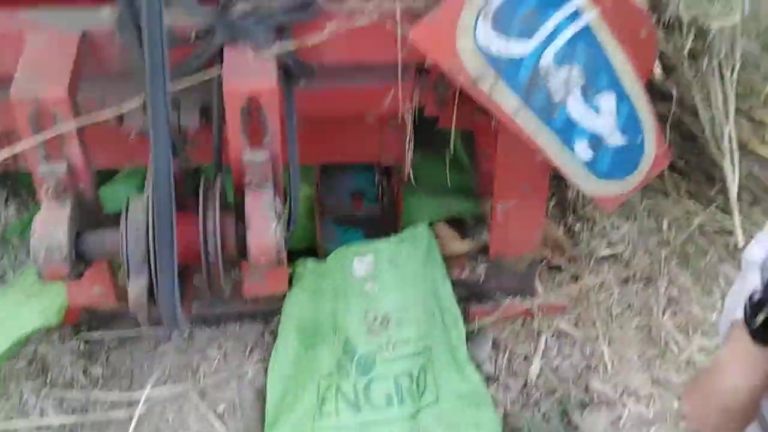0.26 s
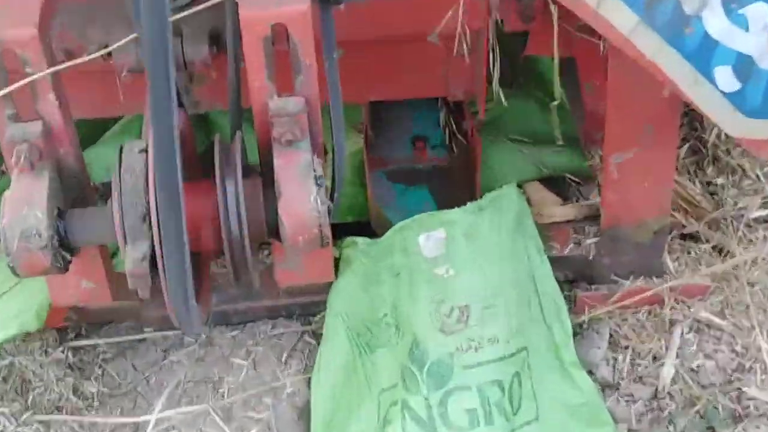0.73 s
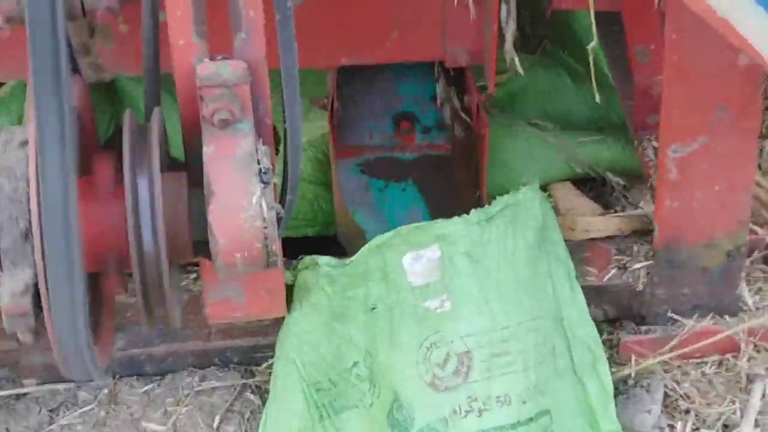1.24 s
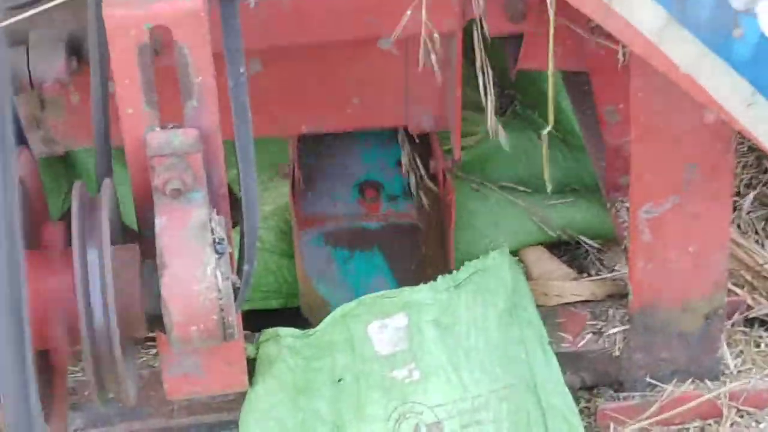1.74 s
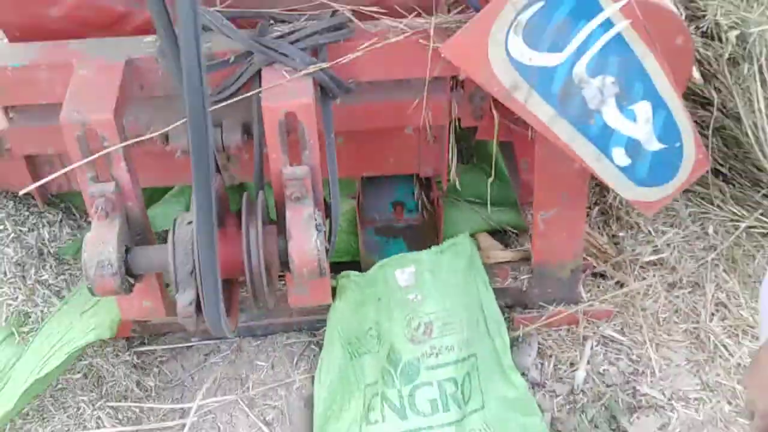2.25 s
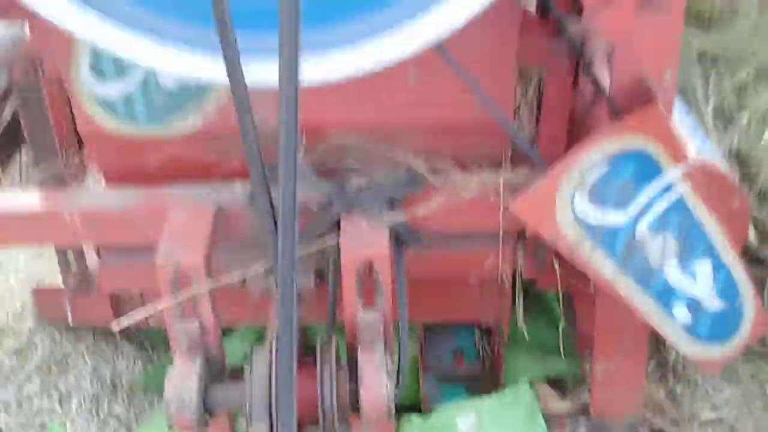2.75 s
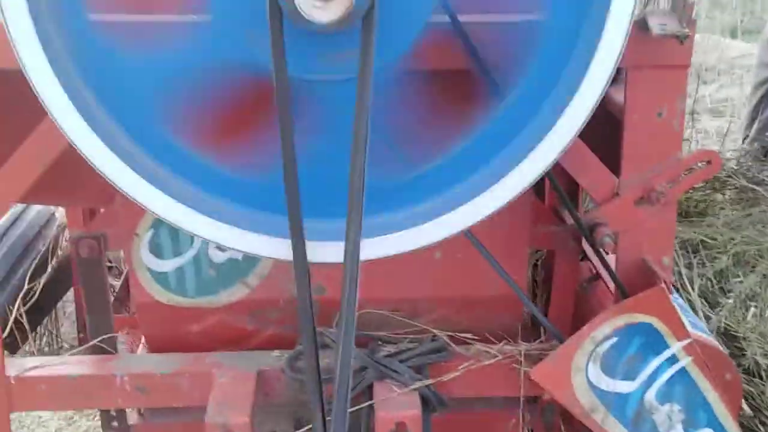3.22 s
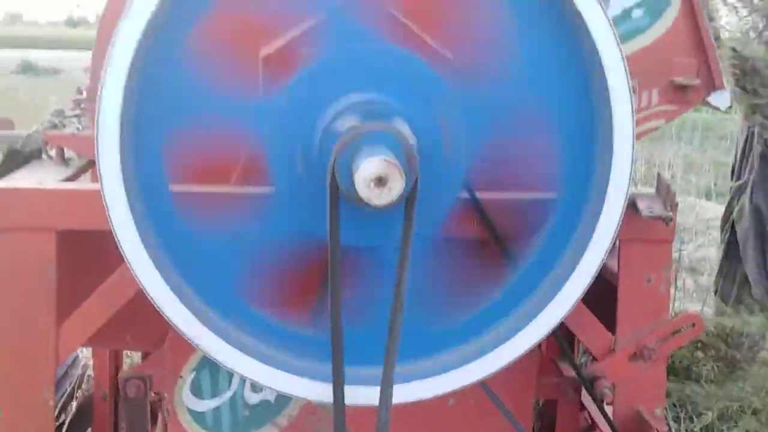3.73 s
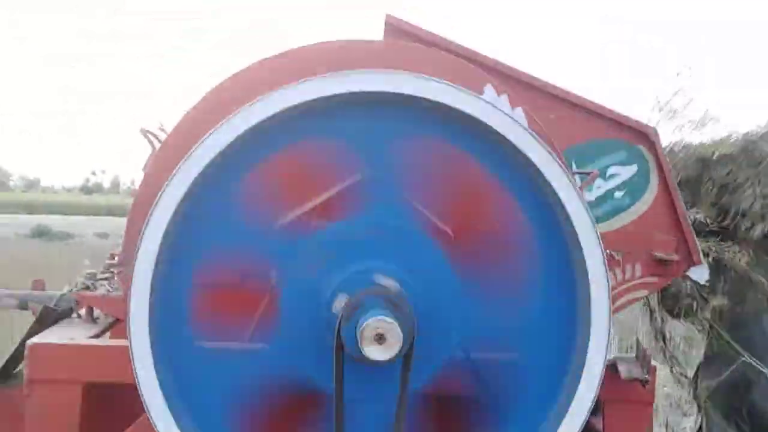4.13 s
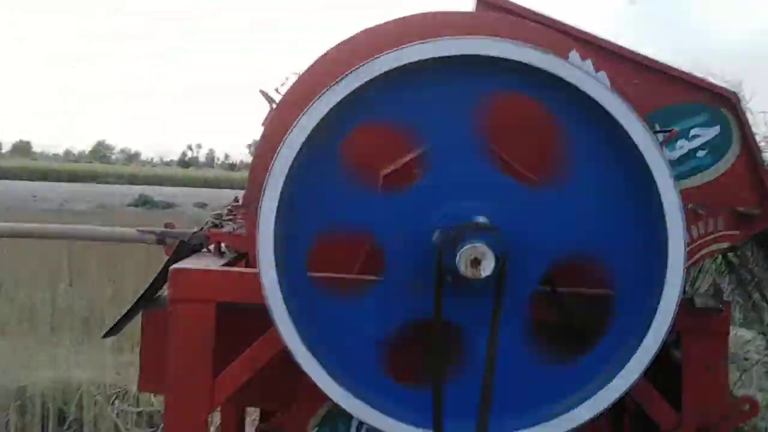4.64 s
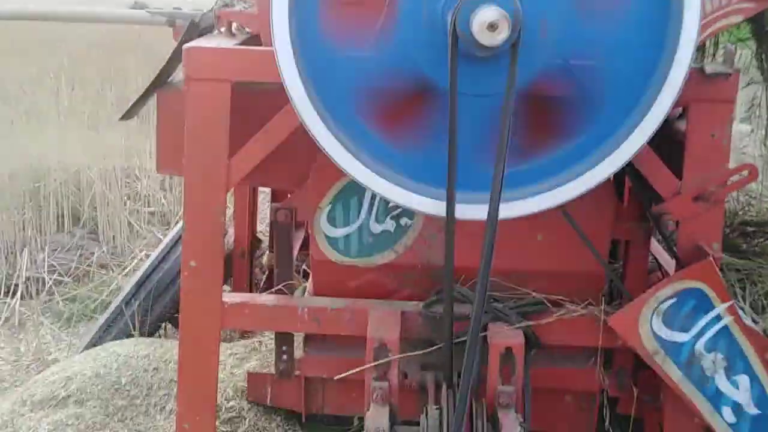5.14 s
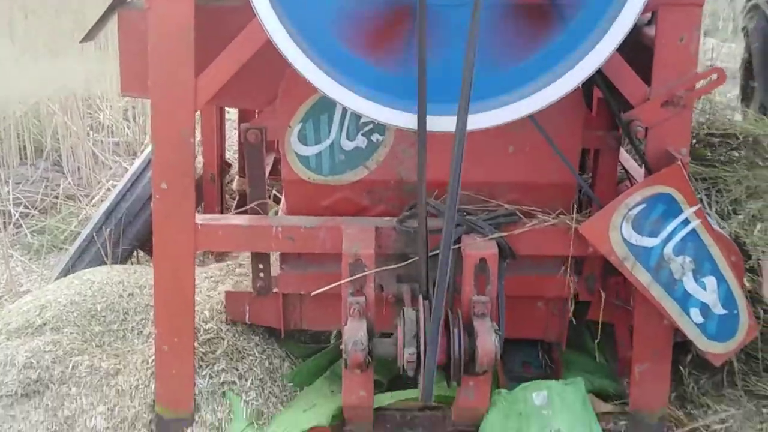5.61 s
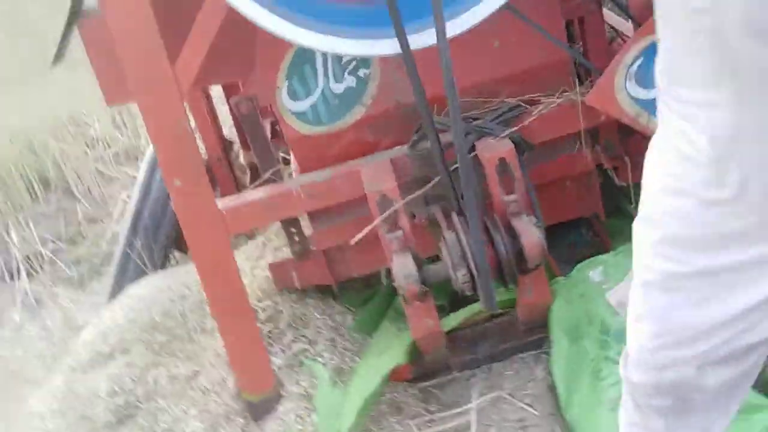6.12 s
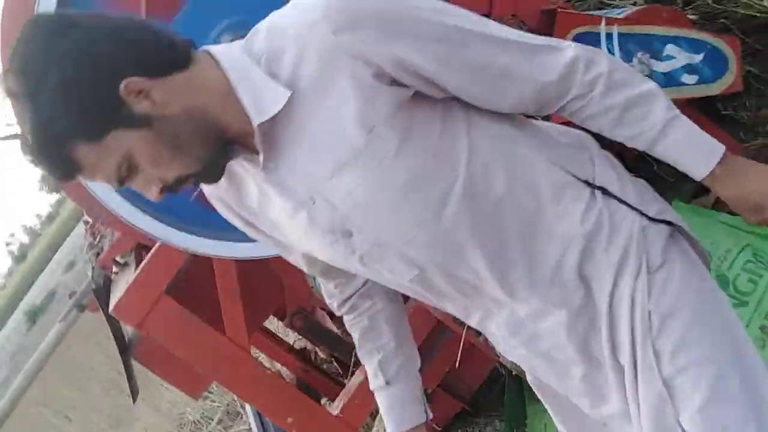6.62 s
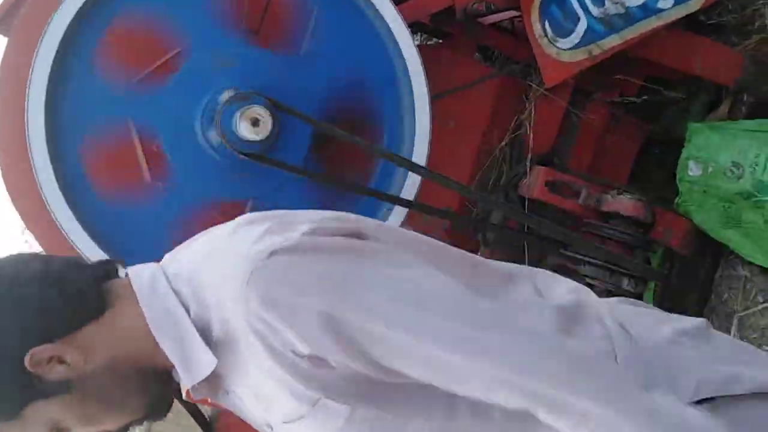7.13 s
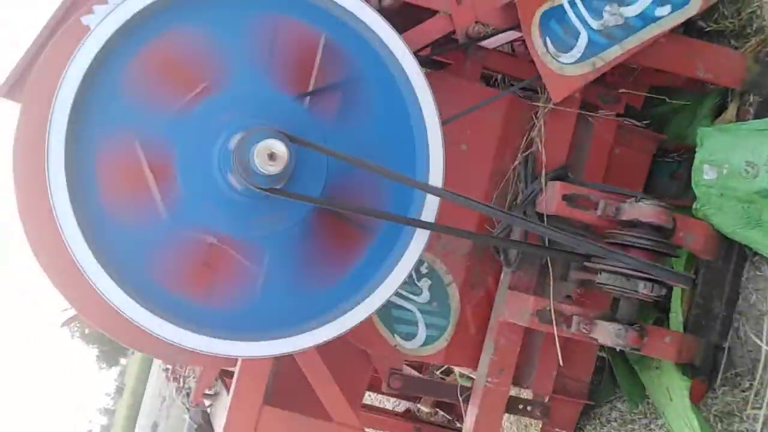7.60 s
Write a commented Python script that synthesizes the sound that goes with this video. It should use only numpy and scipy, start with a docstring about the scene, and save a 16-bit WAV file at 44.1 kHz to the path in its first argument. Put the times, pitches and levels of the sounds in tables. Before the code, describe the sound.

From 0 s a belt-driven thresher is already running at full speed, close and dry in an open field. Its drum rumbles hollowly in a sheet-steel housing, the low and middle tones fluttering and shifting in patches; several times a second one pitch area sinks and snaps back, giving a restless churn. A wide, bright, nearly constant hiss of grain and chaff lies over it, with faint low shaft hums beneath. From about 4.2 s a coarser upper-mid rush fades in on the left. At 4.96 s everything cuts off, silent until about 5.08 s, then abruptly returns. From 5.1 s to the end at 7.9 s the drone is louder, deeper and steadier, the hiss softer. A metal panel sings in brief mid-pitched swells, strongest around 6.8, 7.1 and 7.6 s, with a fainter lower one. Chaff puffs at 5.8 and 7.0 s, with a sharper spit near 7.5 s.

```python
"""A belt-driven thresher runs in an open field, heard through two small microphone ports held close to it. From
the start the drum rumbles in the sheet-steel housing (coloured noise), grain and chaff hiss (high noise) and
shafts hum (wavering sines); throughout, the sound comes and goes in shifting patches. At 4.2 s the ports turn:
two noise bands fade in. Near 5 s the sound drops out and returns from another spot, deeper and with less hiss.
There two panels sing (swelling tones) and chaff spits on the casing (noise puffs)."""
import sys
import numpy as np
from scipy import signal
from scipy.fft import rfft, irfft, next_fast_len
from scipy.io import wavfile
from scipy.ndimage import uniform_filter1d, minimum_filter1d

SR = 44100
rng = np.random.default_rng(int(sys.argv[2]) if len(sys.argv) > 2 else 0)


def wrap_up_sound(samples):
    """Save the sound to the file named by the first command line argument, as 16-bit audio."""
    columns = np.atleast_2d(samples).T
    # keep every value between -1 and 1, then stretch to whole-number steps
    tamed = np.clip(columns, -1, 1)
    steps = np.round(tamed * 32767).astype(np.int16)
    wavfile.write(sys.argv[1], SR, steps)


N = 346626
SWITCH_S, OVERLAP_S = 5.121, 0.05    # change of spot, just after the gap; margin rendered on each side
WINDOW, HOP = 2048, 256    # samples
HZ = np.maximum(np.arange(WINDOW // 2 + 1), 1) * SR / WINDOW    # analysis bins
CUTOFF_HZ = 14680


def from_db(db):
    """Decibels to amplitude gain."""
    return 10 ** (np.asarray(db, float) / 20)


def at_hz(rows, hz):
    """Each column of a spectrum table, interpolated on a log-frequency axis."""
    f, *columns = np.transpose(rows)
    return np.array([np.interp(np.log(hz), np.log(f), column) for column in columns])


def over_time(rows, s):
    """A two-column table of time and value, interpolated at times s."""
    return np.interp(s, *np.transpose(rows))


def slow(shape, size):
    """Noise box-smoothed twice along each axis over about size cells; spread 1."""
    x = rng.standard_normal(shape)
    for axis, cells in enumerate(size):
        for _ in range(2):
            x = uniform_filter1d(x, max(1, round(cells)), axis=axis, mode="wrap")
    return x / x.std()


def wander(size_s, step=32):
    """Slow random curve over the whole sound, changing over about size_s; spread 1."""
    coarse = slow((N // step + 1,), (size_s * SR / step,))
    return np.interp(np.arange(N) / step, np.arange(N // step + 1), coarse)


# Drum rumble. Each row: Hz, relative left dB per Hz, relative right dB per Hz.
FIRST_RUMBLE = [(35, -42, -45), (70.4, -33.5, -27), (139, -32, -40), (195, -19.5, -18), (305, -17.5, -23.5),
                (454, -30.5, -26.5), (605, -21.5, -23), (822, -27, -14.5), (894, -33, -30),
                (1005, -45, -41), (1136, -30.5, -35), (1400, -39, -28.5), (1970, -36.5, -30.5),
                (2540, -67, -31.5)]
SECOND_RUMBLE = [(35, -49, -47), (70, -27, -22.5), (118, -22, -31), (170, -8.5, -5.5), (243, -14.5, -13),
                 (335, -16, -19.5), (476, -12, -11), (603, -59, -39), (745, -20.5, -26), (855, -12, -44),
                 (985, -27, -22), (1510, -24, -19.5), (2110, -20.5, -21), (2340, -41, -24)]
# Ringing housing panels. Each row: Hz, width scale in Hz, relative left dB per Hz, relative right dB per Hz.
FIRST_PANELS = [(230, 12, -12, -13.5), (249.5, 63, -9.5, -8), (280, 12, -17, -13.5),
                (337.4, 14, -13.5, -10), (391, 10, -11.5, -17), (637, 10.4, -14, -12), (478, 16, -28, -11),
                (516, 21, -12, -31), (687, 9, -38.5, -8.5), (679, 12, 0.5, -6.5), (743, 36, -25, -11.5),
                (1220, 140, -29, -31), (1520, 190, -33, -24)]
SECOND_PANELS = [(185.3, 9.6, 4.5, 2), (218, 26, -2, -2), (242, 20, -3, -5.5), (274.8, 16, -4, -3.5),
                 (336.2, 14.7, 1, -1.5), (354, 22, -7, -4.5), (391, 12, -4, -3.5), (437.3, 10.7, 0, -16.5),
                 (474, 10, -9, -7), (802, 95, -13.5, -6.5), (905, 14, -14.5, -22), (1098, 58, -12.5, -26),
                 (1192, 44, -16.5, -14.5), (1420, 20, -14, -18), (1723, 84, -30, -14.5),
                 (2112, 97, -15, -29), (3820, 130, -31, -28), (4455, 90, -20, -26), (6720, 270, -30, -27.5)]
# Rush of grain and chaff. Each row: Hz, relative left dB per Hz, relative right dB per Hz.
FIRST_HISS = [(2460, -39, -29), (3170, -55.5, -24.5), (3700, -55, -26), (4120, -40, -25.5),
              (4550, -26.5, -25.5), (5320, -21.5, -25), (6500, -21.5, -27), (7760, -26, -26.5),
              (9500, -31, -29), (11250, -34.5, -31.5), (14100, -35, -35.5)]
SECOND_HISS = [(2623, -39, -31.5), (2890, -42, -42), (3380, -67, -31.5), (3530, -36, -31.5),
               (4830, -27, -29.5), (5380, -49, -30.5), (5830, -57, -28.5), (6350, -31.5, -31.5),
               (8100, -30.5, -29.5), (9100, -34, -31), (11400, -37.5, -35), (14500, -39, -37.5)]


def housing_power(rumble, panels, hiss):
    """Left and right power spectra: rumble below the first hiss row, hiss above, panel resonances added."""
    power = from_db(np.where(HZ < hiss[0][0], at_hz(rumble, HZ), at_hz(hiss, HZ))) ** 2
    for centre_hz, width_hz, *level_db in panels:
        resonance = 1 / (1 + (2 * (HZ - centre_hz) / width_hz) ** 2) ** 2
        power += from_db(level_db)[:, None] ** 2 * resonance
    return power


# Lulls around one pitch of the rumble. Each row: return in s, length in s, centre in Hz, depth in dB.
LULLS = [(0.323, 0.1, 230, 15), (0.412, 0.063, 750, 17), (0.55, 0.13, 750, 9), (1.042, 0.15, 715, 17),
         (1.166, 0.18, 230, 23), (1.2, 0.13, 770, 19), (1.641, 0.12, 438, 17), (1.592, 0.12, 230, 12),
         (1.822, 0.075, 430, 18), (1.953, 0.17, 774, 16), (2.038, 0.13, 430, 18), (2.477, 0.06, 230, 11),
         (2.506, .2, 430, 16), (2.507, 0.13, 750, 7), (2.941, 0.16, 423, 10.5), (2.947, 0.13, 230, 14),
         (3.367, 0.17, 437, 30), (3.411, 0.29, 740, 12.5), (3.94, 0.28, 230, 14), (3.966, 0.21, 744, 11),
         (4.223, 0.13, 750, 20), (4.464, 0.33, 430, 12), (4.39, 0.089, 750, 12), (4.488, 0.074, 750, 14),
         (6.446, 0.19, 430, 9), (7.057, 0.18, 750, 9), (7.248, 0.12, 429.7, 12)]
LULL_SINK, LULL_RETURN_S = 0.98, 0.025    # share of a lull spent sinking; return time
LULL_SPREAD = 0.33    # reach in pitch, natural-log ratio
REBOUND_SHARE, REBOUND_S = 0.13, 0.032    # overshoot as share of depth; decay


def lulls(s, edges_hz):
    """Loss in dB per pitch region: the level sinks, snaps back, overshoots and settles."""
    loss_db = np.zeros((len(edges_hz) + 1, len(s)))
    centres_hz = np.sqrt(np.multiply(edges_hz[1:], edges_hz[:-1]))
    for back_s, length_s, hz, depth_db in LULLS:
        sinking = np.clip((s - back_s + length_s) / (LULL_SINK * length_s), 0, 1)
        back = np.clip((s - back_s) / LULL_RETURN_S + 0.5, 0, 1)
        rebound = REBOUND_SHARE * np.exp(-np.maximum(s - back_s, 0) / REBOUND_S)
        reach = np.exp(-(np.log(centres_hz / hz) / LULL_SPREAD) ** 4)
        loss_db[1:-1] += depth_db * reach[:, None] * (sinking * (1 - back) - rebound * back)
    return loss_db


# Rumble levels by pitch region. Each row: time in s, then dB of boom, low, low middle, middle, upper,
# low rattle, high rattle.
FIRST_LEVELS = [(0.0, -23.5, -18.5, -43, -31, -29.5, -35.0, -30.5),
                (0.22, -24.5, -31, -26, -17, -25.0, -34.5, -30.5),
                (0.44, -20.5, -26, -27, -22, -26, -33.5, -32.5),
                (0.66, -24.5, -28, -26.5, -21.5, -37, -39.5, -32.5),
                (0.88, -21.5, -28, -26.5, -20.5, -28.5, -29.5, -32.5),
                (1.1, -25.5, -31.5, -23.5, -22.5, -28, -34.5, -31.5),
                (1.32, -23, -29, -30.5, -33, -30.5, -31, -29.5),
                (1.54, -23, -28.5, -26.5, -19, -30, -35, -33),
                (1.76, -25, -27, -31, -28.5, -31.5, -36.5, -29.5),
                (1.98, -22.5, -31, -24.5, -39, -32, -30.5, -31),
                (2.2, -29, -28, -36, -23.5, -28, -35, -30.5),
                (2.42, -22.5, -33, -27, -30, -31.5, -40.5, -32.5),
                (2.64, -25, -25, -33, -21, -29.5, -29.5, -29.5),
                (2.86, -21.5, -34, -24.5, -25.5, -29.5, -35, -33),
                (3.08, -23, -28.5, -28, -26, -34.5, -35.5, -33),
                (3.3, -25.5, -35, -25.5, -22, -23.5, -41, -32),
                (3.52, -24.5, -32.5, -24.5, -33, -29, -35.5, -34),
                (3.74, -24.5, -49.5, -25.5, -19.5, -27, -37, -29.5),
                (3.96, -25.5, -21.5, -33.5, -27, -31.0, -38, -32),
                (4.18, -20, -27, -34, -14, -28.5, -34.5, -32), (4.4, -23, -30, -25, -36, -32, -33, -25),
                (4.62, -23, -23.5, -33.5, -40, -27.5, -33.5, -35.5),
                (4.84, -22.5, -36, -24, -42, -27.5, -40, -34.5), (4.96, -28, -38, -29, -33, -21, -29, -24)]
SECOND_LEVELS = [(5.14, -15.5, -20, -28, -25, -22, -30.5, -32.5),
                 (5.41, -14, -19.5, -18.5, -39, -21, -32, -29.5),
                 (5.68, -15.0, -19.5, -23, -36, -20.5, -31, -27.5),
                 (5.96, -15.5, -21, -20, -40, -25.5, -33, -29), (6.23, -16, -17, -14, -42, -21, -31, -29.5),
                 (6.5, -16, -25, -30, -31, -24, -26, -28.5),
                 (6.77, -17, -25, -22.5, -29, -20.5, -29.5, -27.5),
                 (7.04, -18.5, -23.5, -16.5, -34, -25.5, -28, -29),
                 (7.32, -13, -16.5, -28, -24, -23.5, -28.5, -26.5),
                 (7.59, -15.5, -17, -21.5, -34, -23, -29.5, -26.5),
                 (7.86, -13, -12.5, -30, -23, -28, -31.5, -30)]
# Flow of grain and chaff. Each row: time in s, hiss level in dB.
FIRST_FLOW = [(0, -19), (4.9, -18.8), (4.96, -16.5), (5.1, -15.5)]
SECOND_FLOW = [(5.14, -26), (5.5, -24), (6.0, -25.3), (7.5, -25.3), (7.86, -26.3)]
WOBBLE_DB, WOBBLE_S = 1.5, 0.022    # random level wobble of each rumble region
GUST_S = 0.045    # time scale of the hiss flutter


def region_levels(s, levels, flow, edges_hz, bass_db, gust_db):
    """Level in dB per region: even bass drone, randomly wobbling rumble regions, gusting hiss, less the lulls."""
    t, *columns = np.transpose(levels)
    level_db = [bass_db + 0 * s]
    for column_db in columns:
        wobble_db = WOBBLE_DB * slow((len(s),), (WOBBLE_S * SR / HOP,))
        level_db.append(np.interp(s, t, column_db) + wobble_db)
    level_db.append(over_time(flow, s) + gust_db * slow((len(s),), (GUST_S * SR / HOP,)))
    return np.array(level_db) - lulls(s, edges_hz)


def patches(frames, patch_hz, patch_s):
    """Random field over pitch and time whose neighbouring cells swell and sink together; spread 1."""
    return slow((len(HZ), frames), (patch_hz / HZ[0], patch_s * SR / HOP))


def patch_gain(shared, together, depth_db):
    """Patchy gain for one side, partly shared, with steep edges and deep hollows, evened in power per pitch."""
    field = np.sqrt(together) * shared + np.sqrt(1 - together) * patches(len(shared[0]), 62.0, 0.06)
    field = 1.56 * np.tanh(1.33 * field) - 0.4 * np.minimum(field, 0) ** 2
    patch = from_db(depth_db[:, None] * field)
    mean_power = uniform_filter1d(np.mean(patch ** 2, 1), size=15)
    return patch / np.sqrt(mean_power)[:, None]


# Left-right likeness. Each row: Hz, likeness from 0 to 1.
FIRST_LIKENESS = [(60, 1), (200, 1), (370, 0.98), (700, 0.91), (1000, 0.85), (1500, 0.2), (2500, 0.023),
                  (14000, 0.009)]
SECOND_LIKENESS = [(60, 0.99), (200, 1), (370, 0.97), (750, 0.88), (1000, 0.77), (1500, 0.1), (2500, 0.065),
                   (14000, 0.094)]
# Patch depth. Each row: Hz, dB per unit of field at first spot left, first right, second left, second right.
PATCHY = [(60, 3, 3.5, 7.5, 7), (207, 2, 0, .5, .5), (680, 4.5, 4, 3, 3.5), (1440, 7.5, 5, 6.5, 4),
          (2160, 8, 7, 3, 0), (2860, 5, 3, 15, 19.5), (3440, 9, 1, 9, 10), (4050, 6, 1.5, 4, 7),
          (4520, 2.5, 2.5, 1, 5), (5700, 2, -0.5, 16, 2), (6500, 2, 1, 6, 2), (8100, 4.5, 1.5, 3, 3.5),
          (14000, 4, 7, 7, 2)]
BASS_TOP_HZ = 149.1    # the frame drones evenly below this


def machine(levels, flow, rumble, panels, hiss, likeness, split_hz, patchy_db, lag_s, bass_db, gust_db, span):
    """Drum and chaff: stereo noise coloured by housing and hiss, levelled per region, broken into patches."""
    length = span[1] - span[0]
    noise = rng.standard_normal((2, length))
    _, s, (mid, side) = signal.stft(noise, SR, nperseg=WINDOW, noverlap=WINDOW - HOP)
    s = s + span[0] / SR
    power = housing_power(rumble, panels, hiss)
    alike = np.clip(at_hz(likeness, HZ)[0], 0, 1)
    centre_power = (power.sum(0) + 2 * alike * np.sqrt(power.prod(0))) / 4
    edges_hz = [BASS_TOP_HZ, *split_hz, hiss[0][0]]
    region = np.searchsorted(edges_hz, HZ)
    totals = np.bincount(region, centre_power * (HZ < CUTOFF_HZ))
    level_gain = from_db(region_levels(s, levels, flow, edges_hz, bass_db, gust_db)[region])

    shared, a = patches(len(s), 60.0, 0.045), alike[:, None]
    together = np.clip(1.1 * a, 0, 1)    # alike sides share their patches
    out = []
    for side_power, depth_db, sign in zip(power, patchy_db, (1, -1)):
        colour = np.sqrt(side_power / totals[region] * len(HZ) / 2)[:, None]
        gain = colour * level_gain * patch_gain(shared, together, depth_db)
        out.append(gain * (np.sqrt(1 + a) * mid + sign * np.sqrt(1 - a) * side))
    out[0] = out[0] * np.exp(-2j * np.pi * HZ * lag_s)[:, None]    # left port lies further from the drum
    sound = signal.istft(np.array(out), SR, nperseg=WINDOW, noverlap=WINDOW - HOP)[1][:, :length]
    return np.pad(sound, ((0, 0), (span[0], N - span[1])))


FLUTTER_EDGES_HZ, FLUTTER_S, BEAT_HZ = (150, 350, 600, 950), 0.014, 64.6


def fluttering(sound, beat_share, flutter_db):
    """Each rumble band flutters randomly on its own and throbs with the drum's beaters."""
    size = next_fast_len(N)
    spectrum, hz = rfft(sound, size), np.arange(size // 2 + 1) * SR / size
    beat = 1 + beat_share * np.cos(2 * np.pi * BEAT_HZ * np.arange(N) / SR)
    out = sound.copy()
    for low, high in zip(FLUTTER_EDGES_HZ, FLUTTER_EDGES_HZ[1:]):
        gain = beat * from_db(flutter_db * wander(FLUTTER_S))
        gain /= np.sqrt(np.mean(gain ** 2))
        band = irfft(spectrum * ((hz >= low) & (hz < high)), size)[:, :N]
        out += (gain - 1) * band
    return out


# Shaft and belt hums. Each row: Hz, RMS dB at the first spot, RMS dB at the second.
HUMS = [(46.5, -47.5, -40), (64.6, -45.5, -45), (92.8, -45, -32.5), (111.3, -48, -45), (184.9, -46, -28.5)]


def hums(column, waver_db):
    """Shaft and belt hums: sines of fixed pitch whose strength wavers a little."""
    t = np.arange(N) / SR
    out = np.zeros(N)
    for row in HUMS:
        strength = np.sqrt(2) * from_db(row[column] + waver_db * wander(0.064))
        out += strength * np.sin(2 * np.pi * (row[0] * t + rng.random()))
    return out


# Noise bands that come forward as the ports turn. Each row: start in s, centre in Hz, width in Hz,
# left dB, right dB.
TURN = [(4.22, 2390, 1340, -30.5, -54), (4.3, 3920, 700, -34.5, -58)]


def turning(rise_s=0.14, flutter_db=4.5, strip_hz=250):
    """Noise bands that fade in as the ports turn, each strip of a band fluttering on its own."""
    start, stop = int(TURN[0][0] * SR), int((SWITCH_S + OVERLAP_S) * SR)
    t, out = np.arange(start, stop) / SR, np.zeros((2, N))
    for s, hz, width_hz, *level_db in TURN:
        edges = np.linspace(hz - width_hz / 2, hz + width_hz / 2, int(width_hz / strip_hz) + 2)
        for low, high in zip(edges, edges[1:]):
            band = signal.butter(2, [low, high], "band", fs=SR, output="sos")
            strip = signal.sosfilt(band, rng.standard_normal(len(t)))
            strip /= strip.std() * np.sqrt(len(edges) - 1)
            flutter = from_db(flutter_db * slow(t.shape, (0.037 * SR,)))
            strength = np.clip((t - s) / rise_s, 0, 1) * flutter
            out[:, start:stop] += from_db(level_db)[:, None] * strength * strip
    return out


# Swells of the two singing panels. Each row: peak time in s, half-length scale in s, swell height in dB.
SINGING = [(5.134, 0.018, -23), (5.823, 0.022, -21.5), (6.162, 0.036, -24), (6.276, 0.062, -21.5),
           (6.444, 0.026, -19.5), (6.617, .05, -22), (6.781, 0.025, -15), (6.958, 0.036, -22),
           (7.135, 0.034, -15), (7.28, 0.043, -18.5), (7.56, .008, -15), (7.588, 0.024, -14.5),
           (7.835, 0.026, -20)]
LOWER_SINGING = [(5.23, .03, -28), (6.53, 0.05, -27), (6.87, .06, -25), (7.14, 0.072, -26.5),
                 (7.3, 0.051, -23), (7.41, 0.031, -24), (7.71, 0.034, -21), (7.8, .06, -33)]
SINGING_HZ, LOWER_SINGING_HZ = 805, 659
SINGING_DB, LOWER_SINGING_DB = -27, -51    # between swells


def singing_panel(hz, swells, between_db, waver_db=2.5, wobble_hz=3.8, wander_hz=2.5):
    """A panel's near-pure tone: it swells faster than it falls, flutters, and wanders slightly in pitch."""
    t = np.arange(N) / SR
    pitch_hz = hz + wobble_hz * wander(0.023) + wander_hz * wander(0.1196)
    coarse = t[::32]
    swelling = np.zeros(len(coarse))
    for s, half_s, height_db in swells:
        scale_s = np.where(coarse < s, 0.82 * half_s, 1.13 * half_s)
        swelling += from_db(height_db) * np.exp(-((coarse - s) / scale_s) ** 2)
    strength = np.interp(t, coarse, swelling) + from_db(between_db)
    strength *= from_db(waver_db * wander(0.014))
    return np.sqrt(2) * strength * np.sin(2 * np.pi * np.cumsum(pitch_hz) / SR)


# Chaff bursts on the casing. Each row: peak time in s, noise dB before the band filter, left-right dB,
# rise scale in s, fade scale in s.
SPITS = [(5.78, -18, 3, .018, 0.022), (7.015, -18, -5, .004, .008), (7.471, -6, 1, .0015, .006)]


def spits(band_hz=(4000, 10500)):
    """Chaff bursts: band-passed noise puffs with Gaussian rise and exponential fade."""
    out, t = np.zeros((2, N)), np.arange(-SR // 20, SR // 10) / SR
    colour = signal.butter(2, band_hz, "band", fs=SR, output="sos")
    for s, level_db, pan_db, rise_s, fade_s in SPITS:
        shape = np.where(t < 0, np.exp(-(t / rise_s) ** 2), np.exp(-np.abs(t) / fade_s))
        puff = shape * signal.sosfilt(colour, rng.standard_normal((2, len(t))))
        start = int((s + t[0]) * SR)
        out[:, start:start + len(t)] += from_db(level_db + np.array([[pan_db], [-pan_db]]) / 2) * puff
    return out


# Lean of the ports. Each row: time in s, left-right dB.
LEAN = [(0, 2.7), (1.2, .3), (2.2, 1.5), (3.7, 1.2), (4.7, -0.6), (5.2, -.6), (5.8, 0.5), (7.86, 0.7)]


def scene():
    """First spot, then second, under a slowly changing left-right lean."""
    t = np.arange(N) / SR
    first_patchy, second_patchy = np.split(at_hz(PATCHY, HZ), 2)
    first = machine(FIRST_LEVELS, FIRST_FLOW, FIRST_RUMBLE, FIRST_PANELS, FIRST_HISS, FIRST_LIKENESS,
                    split_hz=(320, 423, 594, 720, 944, 1433), patchy_db=first_patchy, lag_s=0.00012,
                    bass_db=-44.0, gust_db=0.38, span=(0, int((SWITCH_S + OVERLAP_S) * SR)))
    first = fluttering(first, beat_share=0.04, flutter_db=1.5)
    first += hums(column=1, waver_db=1.5) + turning()

    second = machine(SECOND_LEVELS, SECOND_FLOW, SECOND_RUMBLE, SECOND_PANELS, SECOND_HISS, SECOND_LIKENESS,
                     split_hz=(320, 420, 560, 720, 924, 1496), patchy_db=second_patchy, lag_s=0.00003,
                     bass_db=-37.0, gust_db=1.0, span=(int((SWITCH_S - OVERLAP_S) * SR), N))
    second = fluttering(second, beat_share=0.13, flutter_db=1.4)
    second += hums(column=2, waver_db=2.6)
    second += singing_panel(SINGING_HZ, SINGING, SINGING_DB)
    second += singing_panel(LOWER_SINGING_HZ, LOWER_SINGING, LOWER_SINGING_DB)
    second += spits()

    moved = np.clip((t - SWITCH_S) / 0.002, 0, 1)
    lean_db = over_time(LEAN, t) * [[0.5], [-0.5]]
    return from_db(lean_db) * ((1 - moved) * first + moved * second)


# Drop-out with a faint tail after the cut. Each row: time in s, gain in dB.
DROPOUT = [(0, 1), (4.9640, 1.3), (4.9650, -28), (4.974, -26), (4.982, -58), (4.996, -70), (5.0, -120),
           (5.0833, -120), (5.0837, 1), (7.86, 0.6)]
CEILING, HOLD_S = 0.97, 0.0039    # limiter threshold at full scale 1; reach before and after a peak


def record(dry):
    """The ports lose the deepest bass, the signal drops out once, a limiter holds peaks, the top is cut steeply."""
    thin = signal.sosfilt(signal.butter(4, 35, "high", fs=SR, output="sos"), dry)
    gated = thin * from_db(over_time(DROPOUT, np.arange(N) / SR))
    span = 2 * int(HOLD_S * SR) + 1
    allowed = minimum_filter1d(CEILING / np.maximum(np.abs(gated), CEILING), span)
    held = gated * uniform_filter1d(allowed, span)
    return signal.sosfilt(signal.cheby2(20, 70, CUTOFF_HZ, fs=SR, output="sos"), held)


dry = scene()
out = record(dry)
wrap_up_sound(out)
```